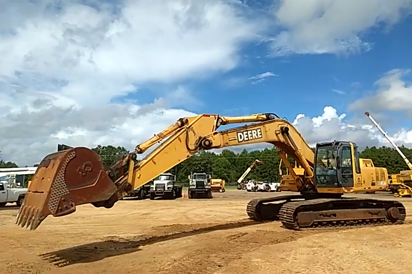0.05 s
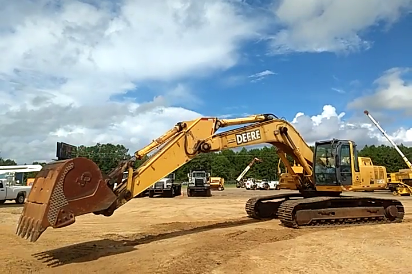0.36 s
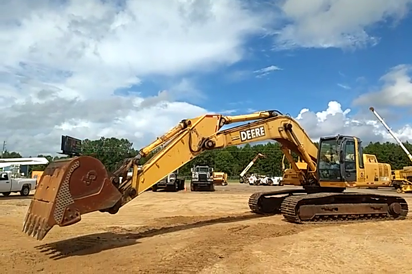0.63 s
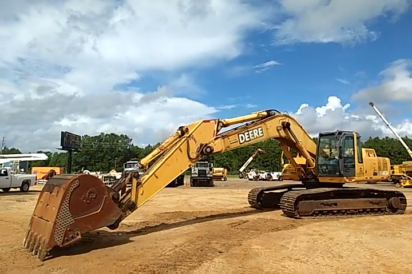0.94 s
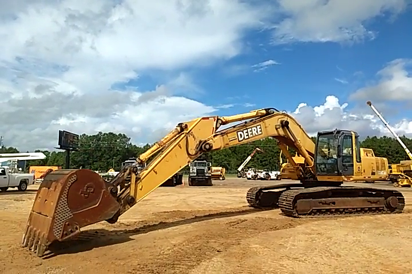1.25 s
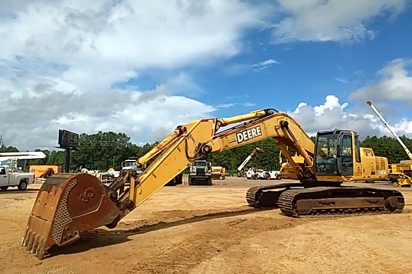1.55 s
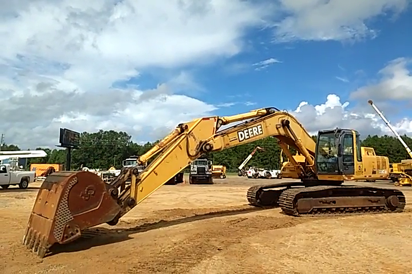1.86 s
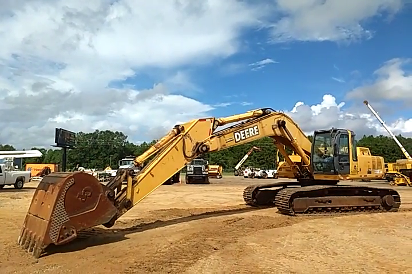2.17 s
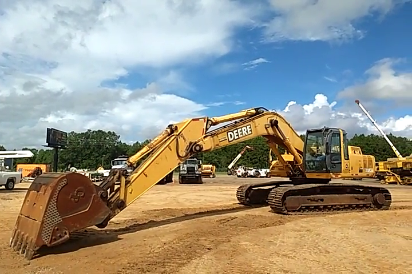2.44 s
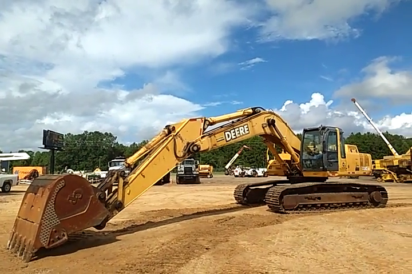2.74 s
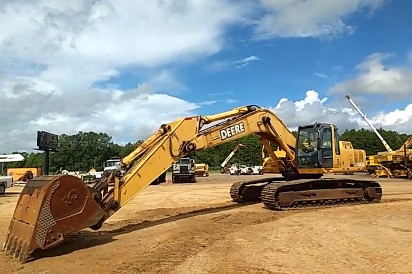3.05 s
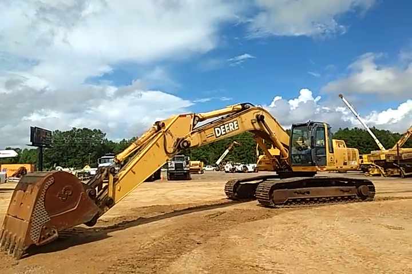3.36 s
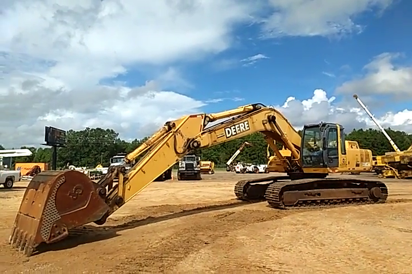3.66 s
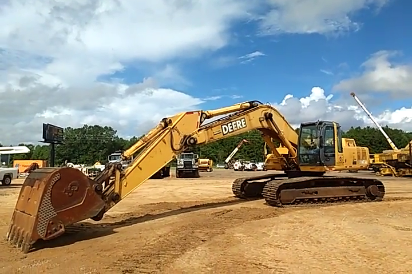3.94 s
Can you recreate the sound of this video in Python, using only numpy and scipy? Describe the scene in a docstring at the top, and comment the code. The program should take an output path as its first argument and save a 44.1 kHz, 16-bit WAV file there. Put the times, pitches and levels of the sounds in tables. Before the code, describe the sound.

An excavator's steel bucket lands on stony dirt with a loud, rattling clang after a few lighter knocks, then jolts three more times, with some scraping. The diesel engine runs throughout outdoors, and wind buffets the microphone.

```python
"""An excavator's steel bucket lands in an open dirt lot and jolts three more times, rattling and scraping.
Each impact excites the steel's modes; the ground thumps under the weight and stones crack under the teeth.
Before the landing, the slack linkage knocks as the arm comes down. The diesel runs throughout and wind
buffets the microphone, whose gain control ducks at each crash and creeps back."""
import sys
import numpy as np
from scipy import signal
from scipy.fft import rfft, irfft, next_fast_len
from scipy.io import wavfile
from scipy.ndimage import uniform_filter1d

SR = 44100
rng = np.random.default_rng(int(sys.argv[2]) if len(sys.argv) > 2 else 0)


def master(y):
    """Save y as 16-bit WAV."""
    cut = np.clip(np.atleast_2d(y).T, -1, 1)
    pcm = np.round(cut * 32767)  # scale
    wavfile.write(sys.argv[1], SR, pcm.astype(np.int16))


N = 176400

# wind strength: time_s, level_db
WIND_GUSTS = [(0, -27.5), (.23, -14), (.36, -28.5), (.72, -33), (1.0, -32.5), (2.5, -25.5), (2.9, -23),
              (3.07, -24.5), (3.62, -19.5), (3.72, -11), (4, -16)]
# wind noise at the microphone: frequency_hz, density_db
WIND_SPECTRUM = [(20, -28), (45, -8), (90, 2), (150, 3.5), (220, 0.5), (320, -12), (600, -22), (2000, -71)]
# engine tones: cycle_multiple, level_db
ENGINE_HARMONICS = [(4, -37), (5, -30.5), (8, -39), (21, -41), (30, -47)]
# combustion and fan noise: frequency_hz, density_db
ENGINE_SPECTRUM = [(30, -37.5), (90, -7.5), (165, 6), (260, -5), (380, -4), (520, -9.5), (800, -3.5),
                   (1150, -7), (1450, -16), (1900, -15.5), (2700, -19.5), (3900, -32), (5500, -33),
                   (9000, -35.5), (15000, -48.5)]
# engine load: time_s, level_db
ENGINE_LOAD = [(0, 1.5), (.55, 0.5), (.9, 1.5), (2.3, 5), (3.0, 2.5), (4, 4)]
# linkage impacts: start_s, level_db, tilt_db_per_octave
LINK_KNOCKS = [(.106, -15.5, 2), (.118, -14.5, -0.5), (.399, -19, 0.5), (.575, -11.5, 1.5),
               (.587, -12.5, 1), (.710, -10, -0.5), (.726, -15, 3), (3.744, -25, 9)]
# linkage modes: pitch_hz, level_db, t60_s
LINK_RESONANCES = [(785, -5, 0.098), (904, 4, 0.18), (1127.4, 3.5, 0.21), (1280, -7, 0.072),
                   (2011, -3.5, 0.14)]
# dense ring of the linkage: frequency_hz, density_db
LINK_SPECTRUM = [(100, -6), (450, -19.5), (700, -1), (1150, 1.5), (1550, -15), (2000, -7.5), (2500, -15.5),
                 (5500, -42.5), (15000, -57)]
# the teeth crush stones: start_s, length_s, level_db
STONE_CRUNCHES = [(1.012, 0.068, 3.5), (1.07, 0.18, -1.5), (1.586, .06, -17)]
# colour of the cracking stones: frequency_hz, gain_db
STONE_SPECTRUM = [(500, -1), (1700, 9), (3400, 4.5), (4600, -6.5), (11500, -22), (15000, -34)]
# the arm's weight meets the ground: start_s, pitch_hz, level_db
GROUND_THUMPS = [(1.046, 220, 5), (1.611, 229, 1)]
# the teeth grind over dirt: start_s, length_s, level_db
TEETH_SCRAPES = [(1.027, 0.35, -6.5), (1.358, 0.26, -14.5), (1.78, 0.21, -13.5), (2.141, 0.24, -13)]
# bucket impacts: start_s, level_db, tilt_db_per_octave
BUCKET_BLOWS = [(1.007, -16, -3), (1.021, 4, 2.5), (1.036, 1.5, -0.5), (1.049, 7.5, 1), (1.095, 4.5, 1.5),
                (1.135, 4, 2.5), (1.156, 3, 1.5), (1.186, -2, 1.5), (1.212, -1, 0.5), (1.308, -4.5, 0),
                (1.372, -18, 4), (1.532, -7, -2.5), (1.592, -6, 0), (1.617, -3.5, -1), (1.661, 4, -1),
                (1.668, 7.5, -0.5), (1.694, 5.5, 0.5), (1.725, -3.5, 4), (2.047, -8, 0.5),
                (2.064, -1.5, -0.5), (2.126, 6.5, 1.5), (2.140, 2.5, 0), (2.157, -1.5, -0.5),
                (2.228, -5, -2), (2.260, -8.5, 1), (3.954, -4, 4.5), (3.961, 1, 4.5)]
# the bucket slips into a new seat, which favours other modes: time_s
SEAT_CHANGES = [1.5, 2.0]
# bucket modes: pitch_hz, first_seat_db, second_seat_db, third_seat_db
BUCKET_RESONANCES = [(148.7, -5.5, -14.5, -6), (386, -1.5, -9, -6), (593, -7.5, -12.5, -5.5),
                     (730, -4, -3.5, 0.5), (762, -9, -4.5, -6), (841, -6.5, -4, -2.5), (890, -5, 0.5, -1),
                     (1114, -6, -3, -5), (1528, -6, -8.5, -5.5), (1739, -13, -12, -6), (1970, -3, -8, -16),
                     (2620, -16, -11, -11), (3290, -9.5, -12, -7.5), (3481, -14, -21, -11)]
# dense ring of the bucket and arm: frequency_hz, density_db
BUCKET_SPECTRUM = [(40, -29.5), (85, -13.5), (130, -4), (250, 1.5), (520, -3.5), (830, 3), (1200, -1.5),
                   (1500, -8), (2000, -3.5), (2950, -6.5), (4000, -21.5), (9000, -38.5), (15000, -56)]
# share of sound arriving from all sides: frequency_hz, level_db
DIFFUSE_SHARE = [(150, -8.5), (500, -14), (1500, -15), (5000, -5.5), (12000, -14.5)]
# phase between the microphone's two ports: frequency_hz, left_lead_rad
PORT_LEAD = [(0, 0), (480, .6), (620, -.6), (1000, 0), (1780, 0), (2060, -3.1), (2850, -3.4), (3400, -5.3),
             (4100, -6.7), (5100, -9), (6400, -12.6), (7600, -15.7), (9000, -12.8), (11600, -6.3),
             (13800, 0), (15000, -1.9)]
# balance between the ports: frequency_hz, left_minus_right_db
PORT_LEAN = [(130, 4), (300, -3), (530, 5.5), (800, -2), (1400, -2), (1600, -1), (1900, -7), (2500, 0.5),
             (6000, -2.5), (8500, 2), (14000, -4.5)]

OPPOSITE = np.array([[1], [-1]])  # left_sign, right_sign
LN_1000 = np.log(1000)  # a 60 dB decay in nepers


def undb(db):
    """Decibels as an amplitude ratio."""
    return 10 ** (np.asarray(db) / 20)


def unit(x):
    """Normalisation to rms 1."""
    return x / np.sqrt(np.mean(x ** 2))


def energy(x):
    """Normalisation to a mean energy of 1 per channel."""
    return unit(x) / np.sqrt(x.shape[-1])


def curve(rows):
    """Linear interpolation of (time_s, value) rows."""
    return np.interp(np.arange(N) / SR, *np.array(rows).T)


def at(points, hz):
    """Log-frequency interpolation of (frequency_hz, value) rows."""
    f, values = np.array(points).T
    return np.interp(np.log(np.maximum(hz, 1)), np.log(f), values)


def colour(x, points):
    """Minimum-phase filtering by (frequency_hz, gain_db) rows; folding the cepstrum makes it causal."""
    size = 8192
    cepstrum = irfft(np.log(undb(at(points, np.fft.rfftfreq(size, 1 / SR)))))
    cepstrum[1:size // 2] *= 2
    cepstrum[size // 2 + 1:] = 0
    response = irfft(np.exp(rfft(cepstrum)))
    n = x.shape[-1]
    padded = next_fast_len(n + size, real=True)
    return irfft(rfft(x, padded) * rfft(response, padded), padded)[..., :n]


def wander(rate_hz):
    """Slow random modulation: smoothed steps of rms 1."""
    hold = int(SR / rate_hz)
    steps = np.repeat(rng.standard_normal(N // hold + 1), hold)
    return unit(uniform_filter1d(uniform_filter1d(steps, hold), hold)[:N])


def stereo_noise(size):
    """Partial coherence: left and right are alike but for the diffuse share."""
    mid, side = rng.standard_normal((2, size))
    return unit(mid + colour(side, DIFFUSE_SHARE) * OPPOSITE)


def swell(start_s, length_s):
    """A half-sine envelope."""
    return np.sin(np.pi * np.clip((np.arange(N) / SR - start_s) / length_s, 0, 1))


def excite(force, response):
    """A linear body radiates the force convolved with its impulse response."""
    return signal.fftconvolve(force[None], response)[:, :N]


def grit(per_s, spread_db=5):
    """Shot noise: random clicks, a few much stronger than the rest."""
    clicks = (rng.random(N) < per_s / SR) * rng.choice([-1, 1], N)
    return unit(clicks * undb(spread_db * np.minimum(rng.exponential(size=N), 4)))


def contacts(rows, chatter_s):
    """Impact forces: each is a brief burst of chatter with its own level and brightness."""
    size = 4096
    t = np.arange(size) / SR
    force = np.zeros(N + size)
    for start, db, tilt in rows:
        chatter = rfft(rng.standard_normal(size) * np.exp(-t / chatter_s))
        whitened = irfft(chatter / np.sqrt(uniform_filter1d(abs(chatter) ** 2, size=15)))
        push = energy(whitened * np.exp(-t / chatter_s / 10))
        push = colour(push, [(hz, tilt * np.log2(hz / 1000)) for hz in (250, 8000)])
        i = int(start * SR)
        force[i:i + size] += undb(db) * push * np.sqrt(SR * .03)
    return force[:N]


def steel(spectrum, t60_s, crack_db, damping=0.39):
    """Impulse response of steel: a crack, then dense modes. t60_s holds at 1 kHz; treble dies sooner."""
    t, f = np.arange(SR) / SR, np.fft.rfftfreq(SR, 1 / SR)
    noise = rfft(stereo_noise(SR))
    octave = np.clip(np.log2(np.maximum(f, 1) / 1000), -4, 4)
    ring = 0
    for k in range(-4, 5):
        band = irfft(noise * np.maximum(1 - abs(octave - k), 0))
        band_t60 = t60_s * 2 ** (-damping * max(k, -1))
        ring = ring + band * np.exp(-LN_1000 * t / band_t60) / np.sqrt(band_t60)
    crack = energy(colour(1. * (t == 0), spectrum))
    return energy(energy(colour(ring, spectrum)) + undb(crack_db) * crack)


def wind(common_db=-15, left_minus_right_db=-4):
    """Turbulent pressure buffets the two ports, mostly in antiphase."""
    common, opposed = unit(colour(rng.standard_normal((2, N)), WIND_SPECTRUM))
    level_db = curve(WIND_GUSTS) + 2.15 * wander(18) + OPPOSITE * left_minus_right_db / 2
    return (undb(common_db) * common + OPPOSITE * opposed) * undb(level_db)


def engine(cycle_hz=39.6, waver=0.00295, firing_depth=0.1, noise_db=-24):
    """Periodic combustion gives harmonics and modulates the amplitude of the diesel and fan noise."""
    phase = 2 * np.pi * np.cumsum(cycle_hz * (1 + waver * wander(5.4))) / SR
    tones = 0
    for multiple, db in ENGINE_HARMONICS:
        amplitude = np.sqrt(2) * undb(db + 2 * wander(9))
        tones = tones + amplitude * np.sin(multiple * phase + 2 * np.pi * rng.random())
    throb = 1 + firing_depth * np.cos(2 * phase)
    roar = unit(colour(stereo_noise(N) * throb * undb(0.65 * wander(25.28)), ENGINE_SPECTRUM))
    return (tones + undb(noise_db) * roar) * undb(curve(ENGINE_LOAD))


def linkage(pins=2, modes_db=-8):
    """Backlash: slack pins knock in turn, each exciting damped modes and a dense ring."""
    out, t = 0, np.arange(SR) / SR
    for k in range(pins):
        modes = 0
        for hz, db, t60 in LINK_RESONANCES:
            mode = np.sin(2 * np.pi * hz * t) * np.exp(-LN_1000 * t / t60)
            modes = modes + undb(db) * rng.choice([-1, 1]) * energy(mode)
        body = energy(steel(LINK_SPECTRUM, t60_s=0.23, crack_db=-4) + undb(modes_db) * modes)
        out = out + excite(contacts(LINK_KNOCKS[k::pins], chatter_s=0.0038), body)
    return out


def stone_crunch(decay_s=0.0021):
    """Brittle fracture: stones crack under the teeth, each in a short burst of noise."""
    pressure = sum(undb(db) * swell(start, length) for start, length, db in STONE_CRUNCHES)
    crack = energy(stereo_noise(SR) * np.exp(-np.arange(SR) / SR / decay_s))
    return colour(excite(pressure * grit(per_s=700), crack), STONE_SPECTRUM)


def ground_thumps(rise_s=0.0077):
    """Heavily damped oscillation: a few low cycles as the ground takes the weight."""
    out = 0
    for start, hz, db in GROUND_THUMPS:
        age = np.maximum(np.arange(N) / SR - start, 0)
        envelope = (age / rise_s * np.exp(1 - age / rise_s)) ** 2
        out = out + undb(db) * envelope * np.sin(2 * np.pi * hz * age)
    return out


def bucket_clang(level_db=-11.5, t60_at_1khz_s=0.61, damping=0.51, waver_hz=3.05, flutter_db=3):
    """Resonance: clear modes store each blow's energy and decay, wavering as the load shifts."""
    out = 0
    for hz, *seat_db in BUCKET_RESONANCES:
        fed = np.zeros(N)
        for start, db, _ in BUCKET_BLOWS:
            seat = np.searchsorted(SEAT_CHANGES, start)
            fed[int(start * SR)] += undb(db + seat_db[seat]) ** 2
        t60 = t60_at_1khz_s * (1000 / hz) ** damping
        stored = signal.lfilter([1], [1, -np.exp(-2 * LN_1000 / (t60 * SR))], fed)
        phase = 2 * np.pi * (np.cumsum(hz + waver_hz * wander(40)) / SR + rng.random())
        amplitude = np.sqrt(stored) * undb(flutter_db * wander(25.14))
        stereo_phase = rng.standard_normal((2, 1)) * hz / 4000  # high modes spread wider
        out = out + amplitude * np.sin(phase + stereo_phase)
    return undb(level_db) * out


def bucket_rattle(points=4, grains_per_s=900, shudder_hz=406):
    """Forced vibration: blows and friction drive the steel, with its own response at each contact point."""
    out = 0
    pressure = sum(undb(db) * swell(start, length) for start, length, db in TEETH_SCRAPES)
    for k in range(points):
        body = steel(BUCKET_SPECTRUM, t60_s=0.46, crack_db=-6)
        # the arm's weight settles and shakes the low modes
        rumble = colour(rng.standard_normal(N), [(shudder_hz, 0), (2 * shudder_hz, -24)])
        shudder = undb(2) * rumble * swell(start_s=0.98, length_s=0.43)
        blows = contacts(BUCKET_BLOWS[k::points], chatter_s=0.0058)
        scrape = pressure * grit(grains_per_s / points)
        out = out + excite(blows + (scrape + shudder) / np.sqrt(points), body)
    return out


def ports(x, low_cut_hz=54):
    """Frequency response: the two ports differ in phase and gain, and pass little deep bass."""
    size = next_fast_len(N + 8192, real=True)
    f = np.fft.rfftfreq(size, 1 / SR)
    lead_rad, lean_db = np.interp(f, *np.array(PORT_LEAD).T), at(PORT_LEAN, f)
    gains = np.array([undb(lean_db / 2) * np.exp(1j * lead_rad), undb(-lean_db / 2)])
    x = signal.sosfilt(signal.butter(2, low_cut_hz, "high", fs=SR, output="sos"), x)
    return irfft(rfft(x, size) * gains, size)[:, :N]


def scene():
    """Superposition: the machine, heard through the ports, plus wind at the microphone."""
    machine = engine() + linkage() + bucket_rattle() + bucket_clang() + ground_thumps() + stone_crunch()
    return ports(machine) + wind()


def record(dry):
    """Compression: the gain ducks at once and recovers slowly; peaks clip and the top is cut."""
    threshold_db, ratio, recover_db_per_s, detect_s, top_hz = -12, 5.58, 8.5, 0.0087, 15100
    power = uniform_filter1d(np.mean(dry ** 2, axis=0), int(detect_s * SR))
    over_db = np.maximum(10 * np.log10(np.maximum(power, 1e-12)) - threshold_db, 0)
    recovery_db = recover_db_per_s * np.arange(N) / SR
    duck_db = np.maximum.accumulate(over_db * (1 - 1 / ratio) + recovery_db) - recovery_db
    out = np.clip(dry * undb(-uniform_filter1d(duck_db, size=128)), -1, 1)
    return signal.sosfilt(signal.ellip(8, .2, 70, top_hz, fs=SR, output="sos"), out)


dry = scene()
out = record(dry)
master(out)
```